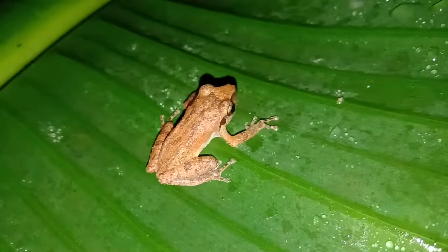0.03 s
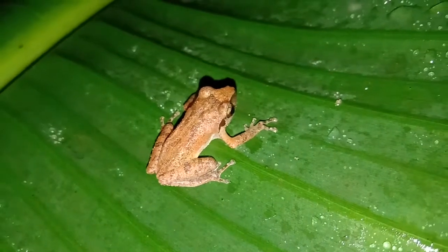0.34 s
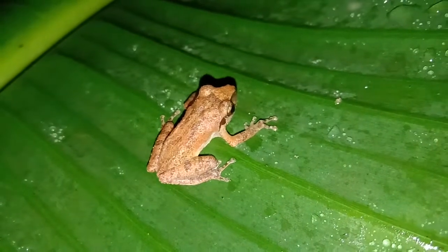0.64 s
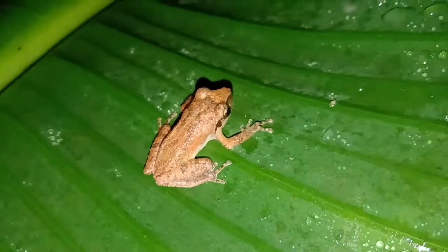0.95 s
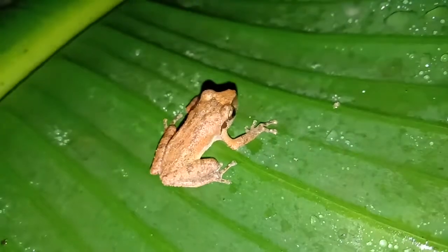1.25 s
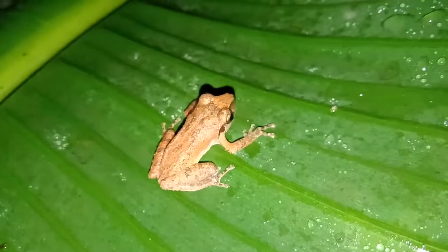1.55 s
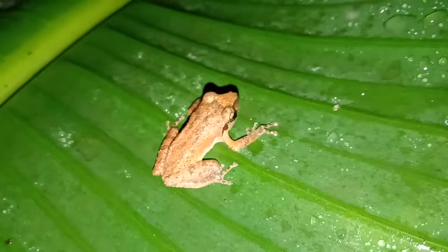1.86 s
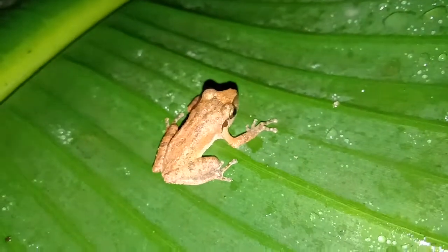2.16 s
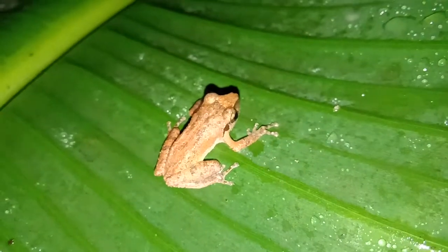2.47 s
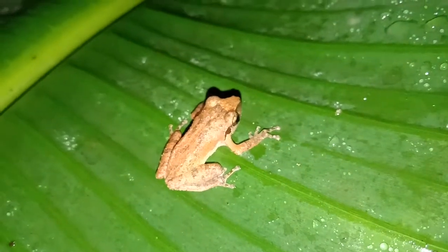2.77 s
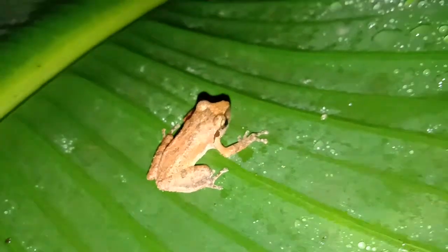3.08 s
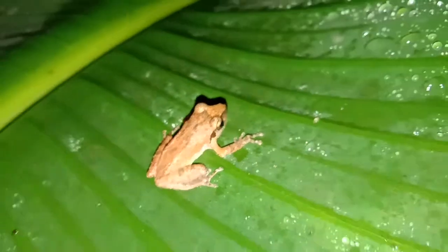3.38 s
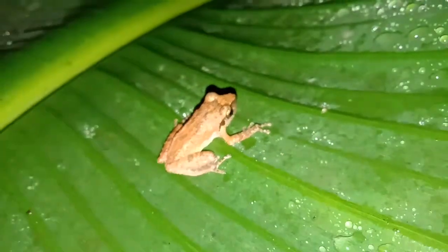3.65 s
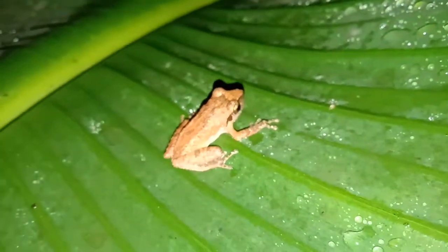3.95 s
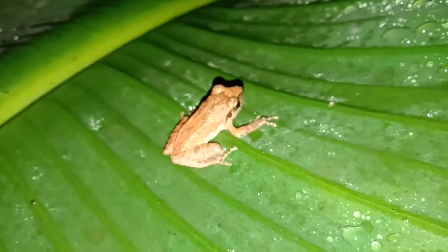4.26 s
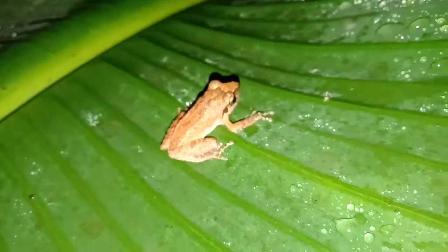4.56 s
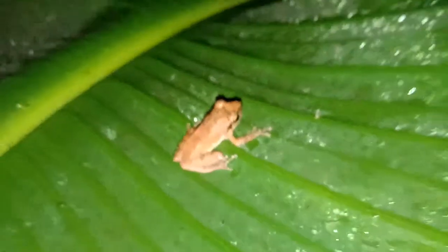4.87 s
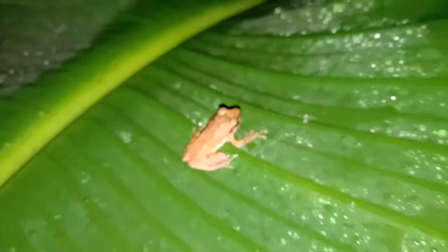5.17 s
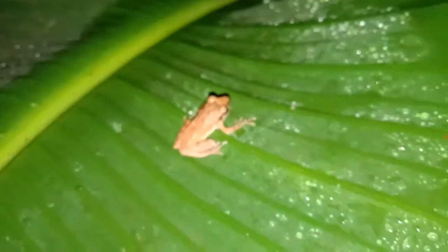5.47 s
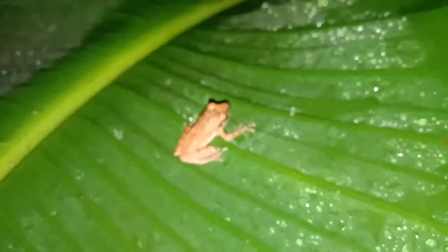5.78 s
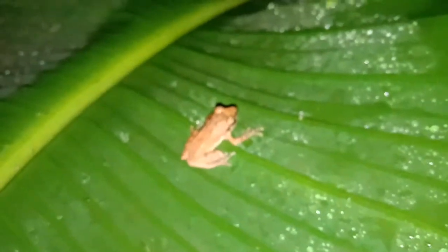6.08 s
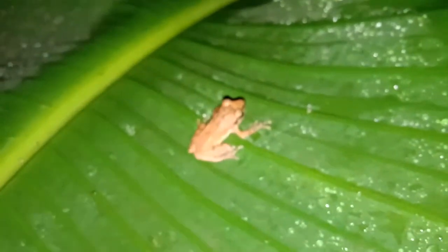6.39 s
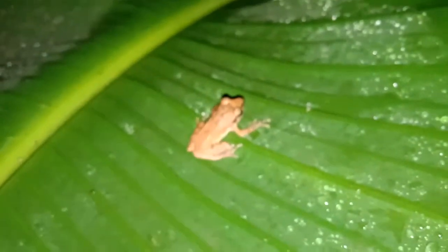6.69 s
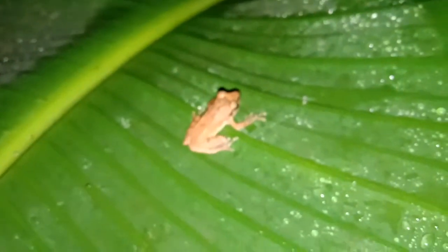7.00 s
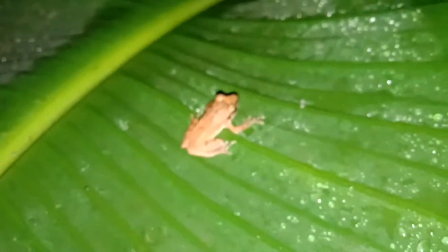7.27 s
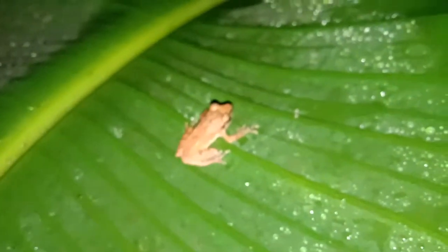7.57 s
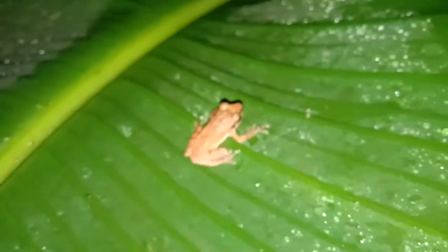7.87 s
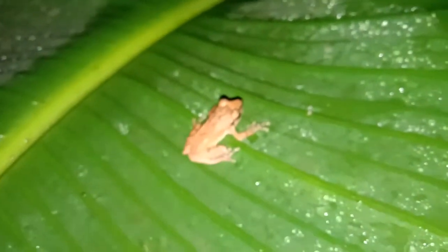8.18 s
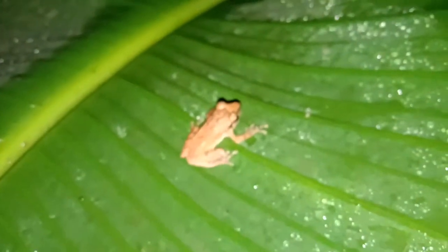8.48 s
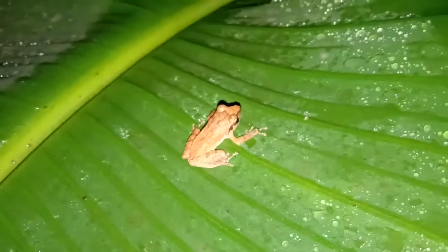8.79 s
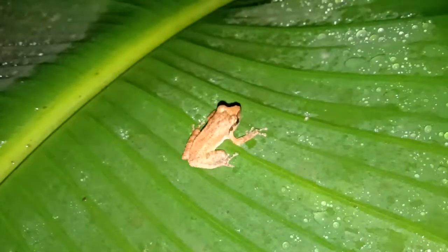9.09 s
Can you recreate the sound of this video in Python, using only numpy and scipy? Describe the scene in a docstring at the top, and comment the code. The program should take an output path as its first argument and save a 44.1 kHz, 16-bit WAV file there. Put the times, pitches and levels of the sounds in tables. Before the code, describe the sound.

Wet tropical undergrowth at night: from the start, insects hiss steadily, crickets pulse softly, and leaves drip, tick and rustle over a faint low rumble. From about 0.8 to 2.2 seconds a small frog gives six high chirps, each two or three very quick falling whistles with a light forest echo. Distant frogs answer near 2, 5 and 8.3 seconds. Just after 3 seconds a far animal rasps faintly, then a nearer, slightly lower and louder frog chirps about four times a second until 4.8. The higher frog returns from 6.3 to 7.7 seconds. The loudest leaf snap comes at 7.5 seconds, between two soft, dull thuds of a hand on the microphone. From 8 seconds the insect hiss swells, and the nearer frog calls again among more sharp ticks until the end, a little after 9 seconds.

```python
"""Night in wet tropical undergrowth. From the start insects hiss, tree crickets pulse their wings,
and leaves drip, tick and rustle over a faint rumble. Near 1 s a small frog chirps, each note a quick
falling whistle; far frogs answer at 2, 5 and 8 s. Just after 3 s a far animal rasps and a lower, nearer
frog takes its turn. The higher frog returns after 6 s, and the loudest snap comes at 7.5 s, between two
dull thuds of a hand on the microphone. From 8 s the insects swell and the lower frog calls to the end."""
import sys
import numpy as np
from scipy import signal
from scipy.fft import rfft, irfft, next_fast_len
from scipy.io import wavfile

SR = 44100
rng = np.random.default_rng(int(sys.argv[2]) if len(sys.argv) > 2 else 0)


def to_wav(sig):
    """Store sig (one row per channel, or 1-D mono) as 16-bit WAV at the path in sys.argv[1].

    Samples outside -1..1 are clipped; the rate is SR.
    """
    pcm = np.clip(np.atleast_2d(sig), -1, 1) * 32767
    pcm = np.round(pcm).astype(np.int16)
    wavfile.write(sys.argv[1], SR, pcm.T)  # frames by channels


N = 411894
TIME = np.arange(N) / SR


def from_db(db):
    """Turn decibels into a number to multiply by."""
    return 10 ** (np.asarray(db) / 20)


def rms_one(x):
    """Scale a sound to an average strength (rms) of 1."""
    return x / np.sqrt(np.mean(x ** 2) + 1e-20)


def along(rows, t):
    """Read each column of a table at the times t, gliding between rows."""
    times, *columns = np.transpose(rows)
    return [np.interp(t, times, column) for column in columns]


def seconds(length):
    """The time of each sample in a short sound."""
    return np.arange(int(length * SR)) / SR


def add(track, start, sound):
    """Mix a sound into a track at a start time in seconds."""
    at = max(int(start * SR), 0)
    track[at:at + len(sound)] += sound[:max(N - at, 0)]


def coloured(x, spectrum):
    """Turn frequencies up or down by a table of (frequency [Hz], level [dB])."""
    size = next_fast_len(len(x))
    hz, db = np.transpose(spectrum)
    bins = np.maximum(np.fft.rfftfreq(size, 1 / SR), 1)
    gain = from_db(np.interp(np.log(bins), np.log(hz), db))
    return irfft(rfft(x, size) * gain, size)[:len(x)]


def resonate(x, hz, width_hz):
    """Let a sound ring at one pitch; a narrower width rings longer."""
    r = np.exp(-np.pi * width_hz / SR)
    feedback = [1, -2 * r * np.cos(2 * np.pi * hz / SR), r * r]
    return signal.lfilter(np.array([1, 0, -1]) * (1 - r * r) / 2, feedback, x + 1e-18)


def resonate_twice(x, hz, width_hz):
    """Ring twice over, leaving less of the other pitches."""
    return resonate(resonate(x, hz, width_hz), hz, width_hz)


def drift(per_s):
    """A random wobble that heads for a new value per_s times a second."""
    targets = rng.standard_normal(4096)
    return rms_one(np.interp(TIME * per_s, np.arange(len(targets)), targets))


def foliage(x, t60, count=3000):
    """Many leaves send back small echoes, which fade by 60 dB in t60 seconds."""
    lag = rng.random(count) * .6
    strengths = rng.standard_normal(count) * from_db(-60 * lag / t60)
    echoes = np.zeros(SR)
    np.add.at(echoes, (lag * SR).astype(int) + 60, strengths)
    return signal.oaconvolve(x, echoes / np.linalg.norm(echoes))[:N]


# The tone of still night air: (frequency [Hz], level [dB])
AIR_TONE = [(20, -55), (60, -31), (170, 5), (300, -6), (700, -7.5), (2200, -16), (3700, -11), (8500, -13),
            (10000, -18), (12000, -24.5), (15500, -19.5)]
# How strong the low rumble is: (time [s], level [dB])
RUMBLE_LEVEL = [(0, -60.5), (2.5, -63.5), (6, -64), (7.6, -60.5), (9.3, -60.5)]
def air():
    """An even hush over a low, unsteady rumble."""
    low_band = signal.butter(3, [60, 135], "band", fs=SR, output="sos")
    rumble = rms_one(signal.sosfilt(low_band, rng.standard_normal(N)))
    rumble *= from_db(along(RUMBLE_LEVEL, TIME)[0] + 3.1 * drift(16))
    hush = rms_one(coloured(rng.standard_normal(N), AIR_TONE))
    return from_db(-62) * hush + rumble


def swarm(hz, width_hz):
    """Many far insects on one pitch merge into a narrow hiss."""
    return rms_one(resonate_twice(rng.standard_normal(N), hz, width_hz))


# How loud the insect chorus is: (time [s], level [dB])
CHORUS_LEVEL = [(0, -59.5), (6.6, -58), (7.4, -61.5), (7.7, -61), (8.05, -54.5), (9.34, -54)]
# The swarms that make up the chorus: (pitch [Hz], width [Hz], level [dB])
CHORUS_SWARMS = [(5700, 1500, -5.5), (6910, 910, 2), (7740, 1900, -1), (8734, 1120, 1)]
# How loud one far, trilling insect is: (time [s], level [dB])
TRILL_LEVEL = [(2.6, -82), (3.2, -60), (5.0, -87), (5.45, -61.5), (6.15, -64), (6.7, -58), (7.55, -63),
               (7.85, -72)]
def insects():
    """A high chorus, a lower swarm, and one unsteady trill that swells and fades."""
    chorus = sum(from_db(db + .87 * drift(8.2)) * swarm(hz, width) for hz, width, db in CHORUS_SWARMS)
    lower = from_db(-65.5 + 1.6 * drift(5)) * swarm(hz=4680, width_hz=700)
    trill = from_db(along(TRILL_LEVEL, TIME)[0] + 1.5 * drift(7)) * swarm(hz=4900, width_hz=380)
    return from_db(along(CHORUS_LEVEL, TIME)[0]) * rms_one(chorus) + lower + trill


def drips(per_s=30, spread_db=3, leaf_count=12):
    """Small drops pat at random on wet leaves of many sizes, which barely ring."""
    sizes = from_db(spread_db * np.minimum(rng.exponential(1, N), 3))
    drops = sizes * (rng.random(N) < per_s / SR)
    leaf_hit = rng.integers(0, leaf_count, N)
    pitches = np.geomspace(450, 3000, leaf_count)
    pats = sum(resonate(drops * (leaf_hit == k), hz, hz / 4) / hz ** .67 for k, hz in enumerate(pitches))
    return from_db(-68.5) * rms_one(pats + foliage(pats, t60=.1))


# The tone of rubbing leaves: (frequency [Hz], level [dB])
RUSTLE_TONE = [(100, -4.5), (300, 7), (700, -1.5), (2200, 2.5), (3700, 1), (8000, 2), (11000, -8.5),
               (15500, -22)]
# Leaves brushing together: (time [s], length [s], level [dB], leaf pitch [Hz], ring boost [dB])
LEAF_BRUSHES = [(0.78, 0.16, -62, 865, 4), (1.47, 0.31, -53, 700, 5), (2.21, 0.26, -67.5, 516, 24),
                (3.415, 0.11, -61.5, 1580, 8), (3.655, 0.35, -64, 1810, 5), (4.138, 0.2, -73, 1520, 14),
                (5.851, 0.091, -57, 1220, 15), (6.276, 0.068, -64, 1400, 14), (6.863, 0.39, -76, 325, 26.5),
                (8.2, 0.86, -70, 6900, 0), (9.04, 0.14, -56, 1480, 3)]
# How much the leaves stir between rustles: (time [s], level change [dB])
LEAF_STIR = [(0, -1), (1.3, -1), (1.9, 2), (2.7, -1.5), (4.5, 4), (4.9, -4.5), (5.4, 1), (6.8, 2.5),
             (9.3, 1)]
def rustle(grain_db=1, patchy_db=6):
    """Leaves rub in small, uneven slips, each with a hollow note; each size stirs in its own time."""
    grainy = rng.standard_normal(N) * from_db(grain_db * drift(260) + 2.54 * drift(40))
    slips = rms_one(coloured(grainy, RUSTLE_TONE))
    brushes = np.zeros(N)
    for start, length, db, hz, ring_db in LEAF_BRUSHES:
        rub = slips[int(start * SR):][:int(length * SR)]
        rub = from_db(db) * np.hanning(len(rub)) * rub
        add(brushes, start, rub + from_db(ring_db) * resonate(rub, hz, hz / 3))
    leaves = sum(from_db(patchy_db * np.minimum(drift(26), 1.7)) * resonate(slips, hz, hz / 3)
                 for hz in np.geomspace(280, 2400, num=6))
    stirring = from_db(-67.5 + 1.3 * drift(5.7)) * rms_one(leaves) + from_db(-65) * slips
    return brushes + from_db(along(LEAF_STIR, TIME)[0]) * stirring


# A hand shifting on the microphone: (time [s], push level [dB])
HAND_BUMPS = [(1.55, -66), (3.029, -60.5), (6.395, -59), (7.202, -53), (7.712, -51.5), (8.741, -57)]
def hand_bumps(t60=.091):
    """Soft touches on the microphone's case give short, dull thuds."""
    push, t = np.zeros(N), seconds(.3)
    for start, db in HAND_BUMPS:
        add(push, start, from_db(db - 60 * t / t60) * rng.standard_normal(len(t)))
    return from_db(36.5) * resonate_twice(push, hz=96.5, width_hz=113)


def crunch(t60, grain_db=3):
    """One sharp contact, then a dying shower of tiny ones."""
    t = seconds(.25)
    shower = rng.standard_normal(len(t))
    grains = np.repeat(rng.standard_normal(len(t)), 24)[:len(t)]
    shower *= from_db(grain_db * grains)
    shower[0] = 6   # the first contact
    return shower * from_db(-60 * t / max(t60, .005))


def faint_snaps(per_s=2, knock_db=-62, crack_db=-68, ring_db=-48, t60=.06):
    """Extra rows for LEAF_HITS: faint snaps at random moments, each on its own leaf."""
    return [((k + when) / per_s, knock_db + 6 * size, crack_db, t60, 1200 + 1800 * leaf, ring_db)
            for k, (when, size, leaf) in enumerate(rng.random((64, 3))) if k + when < per_s * N / SR]


# The loudest drips and snaps on leaves:
# (time [s], knock level [dB], crack level [dB], fade time [s], ring pitch [Hz], ring level [dB])
LEAF_HITS = [(.153, -55.5, -77, 0.23, 2100, -47), (.813, -59, -79, 0.087, 2500, -47),
             (.858, -54, -76, 0.082, 1010, -37), (1.497, -59, -64.5, 0.068, 4900, -45),
             (2.05, -60, -66, 0.17, 2370, -46), (2.921, -52, -68.5, 0.21, 2840, -31),
             (3.545, -52.5, -72, 0.091, 1140, -29), (3.684, -58, -77, 0.15, 1210, -38),
             (3.835, -49.5, -65.5, 0.18, 1960, -43), (4.114, -57, -64, 0.046, 2320, -38),
             (4.245, -67, -70, 0.077, 1670, -38), (4.359, -49, -69, 0.081, 1780, -36),
             (4.615, -82.5, -70, .037, 3090, -69.5), (4.72, -53, -62, 0.093, 2180, -39),
             (5.11, -57, -80, 0.14, 1100, -40.5), (5.459, -54, -82, 0.15, 1930, -37.5),
             (6.012, -46, -64, 0.18, 1676, -29), (6.213, -49.5, -61, 0.051, 2310, -38),
             (6.4, -56, -69, 0.17, 1510, -44), (6.54, -70, -62.5, 0.13, 2800, -49),
             (6.894, -54.5, -86, 0.19, 597, -36), (7.509, -39, -64, 0.053, 1320, -22.5),
             (7.5119, -36, -75, 0.069, 2340, -24), (7.617, -47.5, -68, 0.079, 1370, -31),
             (7.873, -51, -60, 0.12, 1870, -33), (8.311, -56, -65, 0.11, 1540, -34.5),
             (8.459, -53.5, -69, 0.099, 1950, -43), (8.655, -52.5, -71, 0.15, 1980, -31.5),
             (8.7491, -48, -57.5, 0.094, 2440, -26.5), (8.937, -56, -72, 0.073, 1600, -48),
             (9.069, -49, -76, 0.057, 1180, -44), (9.0973, -45.5, -54, .04, 2440, -26),
             (9.165, -56.5, -67, 0.18, 1290, -40), (9.25, -70, -59, 0.029, 3000, -49)]
# The tones that all struck leaves share: (pitch [Hz], width [Hz], level [dB])
LEAF_TONES = [(253, 63, 9), (775, 285, 7.5), (1320, 114, 9.5), (1780, 930, 8), (2340, 1070, 13),
              (3090, 1900, 7.5), (4850, 1570, 3)]
# The brittle top of a tick: (frequency [Hz], level [dB])
CRACK_TONE = [(1500, -6), (3500, 16.5), (7500, 24.5), (9500, 14), (12000, 8), (15500, 2)]
def leaf_ticks():
    """Each hit knocks the shared leaf tones, rings its own leaf and gives a brittle crack."""
    knocks, rings, cracks = np.zeros((3, N))
    for start, knock_db, crack_db, t60, hz, ring_db in LEAF_HITS + faint_snaps():
        blow = crunch(t60)
        ring = resonate(resonate(blow, hz, hz / 14), hz, hz / 3)
        add(knocks, start, from_db(knock_db) * blow)
        add(rings, start, from_db(ring_db) * ring)
        add(cracks, start, from_db(crack_db) * crunch(t60))
    # every other tone is flipped, so neighbours do not cancel between their pitches
    body = sum((-1) ** k * from_db(db) * resonate(knocks, hz, width)
               for k, (hz, width, db) in enumerate(LEAF_TONES))
    ticks = from_db(3.5) * (body + rings) + coloured(cracks, CRACK_TONE)
    return ticks + from_db(-10) * foliage(ticks, t60=.22)


def surroundings():
    """Everything that is not an animal."""
    return leaf_ticks() + drips() + rustle() + hand_bumps() + air()


# How much the left and right sides differ: (frequency [Hz], level [dB])
STEREO_WIDTH = [(70, -24), (250, -13), (1000, -10), (2500, -14), (5000, -13), (7000, -30), (9000, -38),
                (12000, -3), (15000, -9)]
def surround(middle, other):
    """Both sides hear nearly the same; a second sound, added left and taken away right, gives width."""
    return middle + coloured(other, STEREO_WIDTH) * [[1], [-1]]


def far_rasp(start_s=3.11, length_s=.22, pulses_per_s=50, depth=.61):
    """A far animal's short, hoarse, throbbing call."""
    loudness, t = np.zeros(N), seconds(length_s)
    throb = signal.windows.tukey(len(t), .3) * (1 + depth * np.sin(2 * np.pi * pulses_per_s * t))
    add(loudness, start_s, from_db(-59) * throb)
    return foliage(loudness * swarm(hz=2440, width_hz=770), t60=.12)


def cricket_chirp(length, hz, sag, strokes_per_s=55):
    """A run of uneven wing strokes; the pitch sags within each stroke and along the chirp."""
    t = seconds(length)
    stroke = t * strokes_per_s * rng.uniform(.85, 1.15) % 1   # runs from 0 to 1 in each stroke
    unsteady = .022 * np.interp(t * 90, np.arange(64), rng.standard_normal(64))
    fall = 1 - 2 * t / length + 2.2 * (1 - 2 * stroke)
    pitch = hz * (1 + sag * fall + unsteady)
    wings = np.sin(np.pi * stroke) * np.sin(2 * np.pi * np.cumsum(pitch) / SR)
    return rms_one(signal.windows.tukey(len(t), .15) * wings)


# The nearest cricket's falling chirps: (time [s], level [dB])
FALLING_CHIRPS = [(.05, -65), (0.401, -63), (.54, -65), (.69, -65), (0.881, -66), (1.45, -62),
                  (1.709, -61.5), (2.049, -60), (2.41, -62.5), (2.631, -63.5), (2.77, -64), (3.061, -62.5),
                  (3.428, -62.5), (3.69, -64), (4.03, -62.5), (4.26, -60.5), (5.13, -60.5), (5.47, -61.5),
                  (5.77, -61), (6.07, -62), (6.601, -61), (6.85, -63), (7.2, -61.5), (7.48, -59),
                  (7.64, -63.5), (7.859, -61), (8.111, -59), (8.37, -59), (8.889, -61.5), (9.079, -59.5),
                  (9.222, -62)]
# A second cricket's longer, steadier chirps: (time [s], length [s])
STEADY_CHIRPS = [(1.035, 0.31), (3.032, .3), (4.562, 0.29), (6.778, .46), (8.40, 0.35)]
def tree_crickets():
    """Two crickets chirp through the leaves, and many more blur behind them."""
    chirps = np.zeros(N)
    for start, db in FALLING_CHIRPS:
        add(chirps, start, from_db(db) * cricket_chirp(length=.19, hz=2930, sag=.0328))
    for start, length in STEADY_CHIRPS:
        add(chirps, start, from_db(-63.5) * cricket_chirp(length, hz=3100, sag=.0126))
    farther = from_db(-69.5) * swarm(hz=2942, width_hz=330)
    return from_db(-8) * chirps + from_db(.5) * foliage(chirps, t60=.3, count=5000) + farther


# Calls of far frogs:
# (time [s], notes [count], first pitch [Hz], last pitch [Hz], level [dB], ring width [Hz])
FAR_FROG_CALLS = [(2.059, 3, 3740, 3790, -36, 320), (4.98, 3, 4040, 4050, -35.5, 455),
                  (8.285, 5, 3737, 3976, -29, 420)]
def far_frogs(note_s=.036, gap_s=.076, swell_db=6.5, fall=.233, pitch_spread=.0191):
    """Runs of falling notes swell and climb a little, echoing off nearby plants and then the forest."""
    calls, t = np.zeros(N), seconds(note_s)
    for start, notes, first_hz, last_hz, db, width_hz in FAR_FROG_CALLS:
        for k, progress in enumerate(np.linspace(0, 1, round(notes))):
            hz = first_hz + (last_hz - first_hz) * progress
            pitch = hz * (1 + pitch_spread * rng.standard_normal())
            sweep = signal.chirp(t, pitch * (1 + fall), note_s, pitch * (1 - fall))
            note = resonate(signal.windows.cosine(len(t)) * sweep, hz, width_hz)
            add(calls, start + k * gap_s, from_db(db - swell_db * (1 - progress)) * note)
    through_plants = from_db(-6) * calls + foliage(calls, t60=.2, count=4000)
    return foliage(through_plants, t60=.68, count=6000)


def whistle(shape, overtone_db, pitch_ratio, pitch_spread=.0077):
    """One falling note with a weak overtone at three times its pitch; no two are quite alike."""
    t = seconds(shape[-1][0])
    hz, db = along(shape, t)
    pitch = hz * (pitch_ratio + pitch_spread * rng.standard_normal())
    phase = 2 * np.pi * np.cumsum(pitch) / SR
    tone = np.sin(phase) + from_db(overtone_db) * np.sin(3 * phase)
    return from_db(db) * signal.windows.tukey(len(t), .15) * tone


def frog_call(shape, notes, gap_s, overtone_db, lead_in_ratio, lead_in_db=-16, first_db=-1.5):
    """A soft, lower lead-in note, then the full notes as the frog's throat sac fills."""
    call = np.zeros(SR // 4)
    for k, db in enumerate([lead_in_db, first_db, 0, 0][:round(notes) + 1]):
        add(call, k * gap_s, from_db(db) * whistle(shape, overtone_db, lead_in_ratio if k == 0 else 1))
    return call


# One note of the higher frog: (time in the note [s], pitch [Hz], level [dB])
HIGH_FROG_NOTE = [(0, 5520, -16), (.005, 5190, -4), (.009, 4880, -1), (.012, 4630, 0), (.015, 4470, -3),
                  (.020, 4280, -19)]
# Its calls: (time [s], notes [count], level [dB])
HIGH_FROG_CALLS = [(.828, 2, -34), (1.048, 2, -33.5), (1.268, 2, -33.5), (1.52, 3, -34), (1.808, 3, -34),
                   (2.096, 3, -34), (6.31, 2, -39.5), (6.528, 3, -37.5), (6.782, 2, -37.5), (7.037, 2, -37),
                   (7.319, 3, -34), (7.609, 2, -32)]
# Its unmuffled sound grows as the microphone moves into plain view: (time [s], level [dB])
HIGH_FROG_IN_VIEW = [(3, -18), (6, -6)]
def high_frog(gap_s=.0323):
    """Half hidden in plants: mostly the low end of a note comes straight; echoes carry all of it."""
    calls = np.zeros(N)
    for start, notes, db in HIGH_FROG_CALLS:
        call = frog_call(HIGH_FROG_NOTE, notes, gap_s, overtone_db=-32, lead_in_ratio=.92)
        add(calls, start - gap_s, from_db(db) * call)
    muffled = resonate(calls, hz=4570, width_hz=170)
    clear = from_db(along(HIGH_FROG_IN_VIEW, TIME)[0]) * calls
    plants = from_db(-9.5) * foliage(calls, t60=.13, count=4000)
    forest = from_db(-2.5) * foliage(calls, t60=.5, count=2000)
    return muffled + clear + plants + forest


# One note of the lower, nearer frog: (time in the note [s], pitch [Hz], level [dB])
LOW_FROG_NOTE = [(0, 4790, -20), (.003, 4680, -7), (.007, 4540, 0), (.0105, 4370, -5), (.014, 4190, -3.5),
                 (.017, 4060, -7), (.020, 3940, -20)]
# Its calls: (time [s], notes [count], level [dB])
LOW_FROG_CALLS = [(3.335, 2, -29), (3.567, 3, -28.5), (3.822, 3, -28.5), (4.071, 3, -29), (4.355, 3, -29.5),
                  (4.676, 2, -29), (8.064, 2, -30), (8.286, 3, -28.5), (8.54, 3, -29), (8.823, 3, -29.5),
                  (9.145, 3, -29)]
# Its sound paths change as the microphone moves: (time [s], straight path width [Hz], leaf echo [dB])
LOW_FROG_PATHS = [(4.8, 420, -18), (8.0, 850, -4.5)]
def low_frog(gap_s=.0332, ground_lag_s=.0122, leaf_lag_s=.0078, ground_db=-1.5, lag_spread=.06):
    """Echoes off the ground and a leaf overlap each note and roughen it, differently in every call."""
    calls, close = np.zeros((2, N))
    for start, notes, db in LOW_FROG_CALLS:
        call = from_db(db) * frog_call(LOW_FROG_NOTE, notes, gap_s, overtone_db=-17, lead_in_ratio=.96)
        straight_width, leaf_db = along(LOW_FROG_PATHS, start)
        add(calls, start - gap_s, call)
        add(close, start - gap_s, resonate(call, hz=4540, width_hz=straight_width))
        for lag_s, echo_db, width_hz in (ground_lag_s, ground_db, 420), (leaf_lag_s, leaf_db, 900):
            echo = from_db(echo_db) * resonate_twice(call, hz=4480, width_hz=width_hz)
            delay = lag_s * (1 + lag_spread * rng.uniform(-1, 1))
            add(close, start - gap_s + delay, echo)
    scattered = resonate(calls, hz=4640, width_hz=900)
    overtone = resonate(calls, hz=14200, width_hz=600)
    sheen = from_db(-17) * foliage(overtone, t60=.2)
    plants = from_db(-10) * foliage(scattered, t60=.16)
    forest = from_db(-4.5) * foliage(scattered, t60=.65, count=2000)
    return from_db(-1) * close + sheen + plants + forest


def scene():
    """The animals are straight ahead; leaves and air are all around."""
    animals = high_frog() + low_frog() + far_frogs() + tree_crickets() + far_rasp() + insects()
    return animals + surround(surroundings(), surroundings())


def record(dry, cutoff_hz=15600):
    """Cut the very highest treble steeply."""
    return signal.sosfilt(signal.ellip(10, .1, 70, cutoff_hz, fs=SR, output="sos"), dry)


dry = scene()
out = record(dry)
to_wav(out)
```